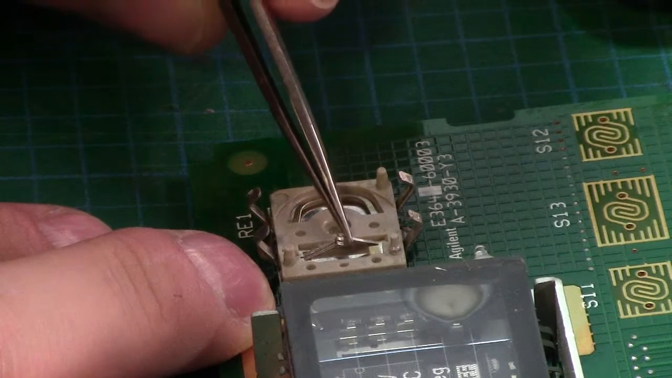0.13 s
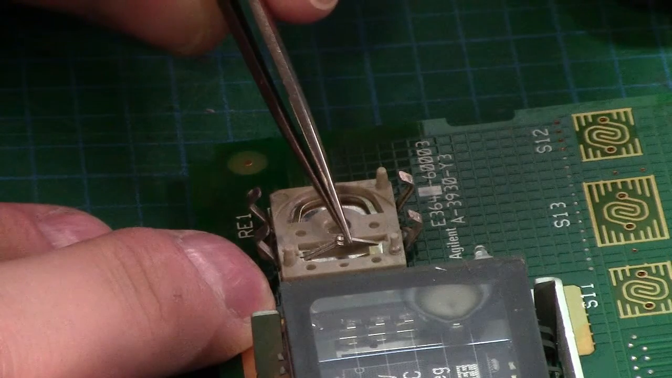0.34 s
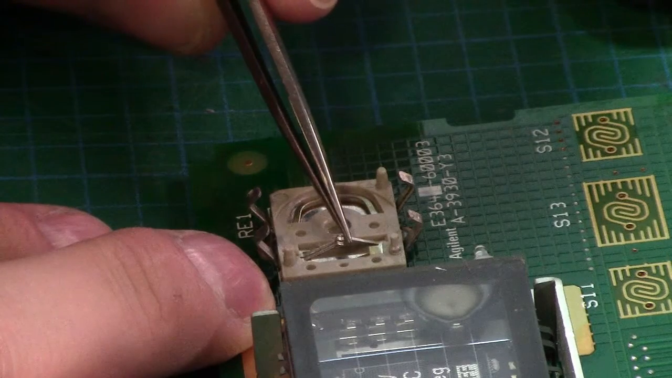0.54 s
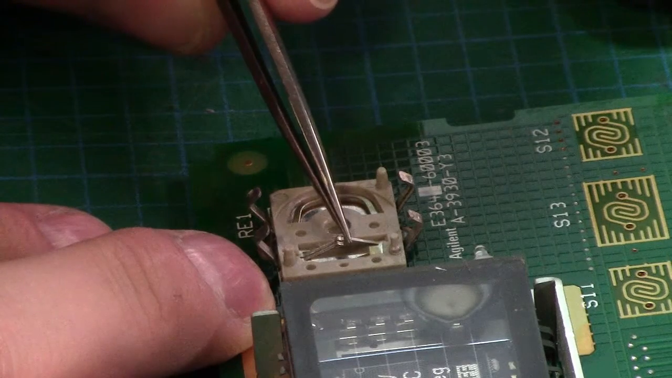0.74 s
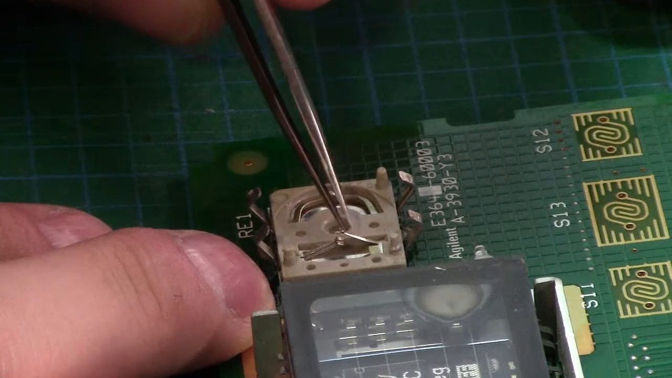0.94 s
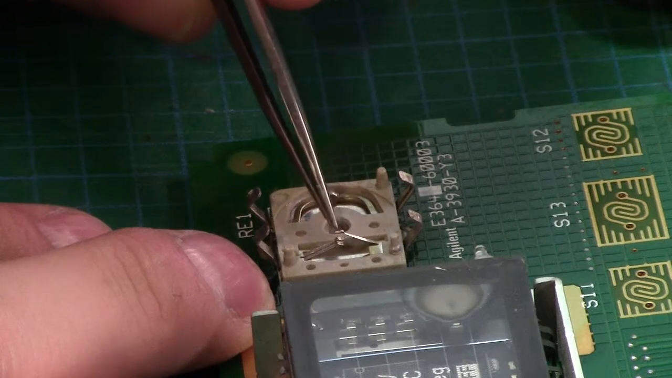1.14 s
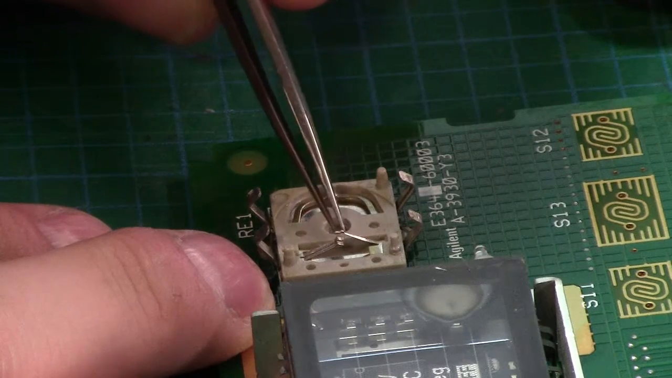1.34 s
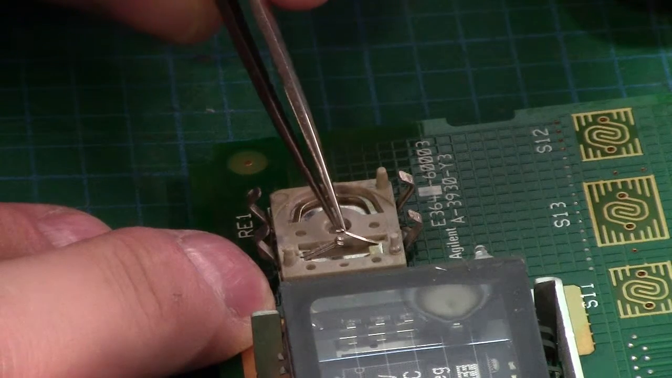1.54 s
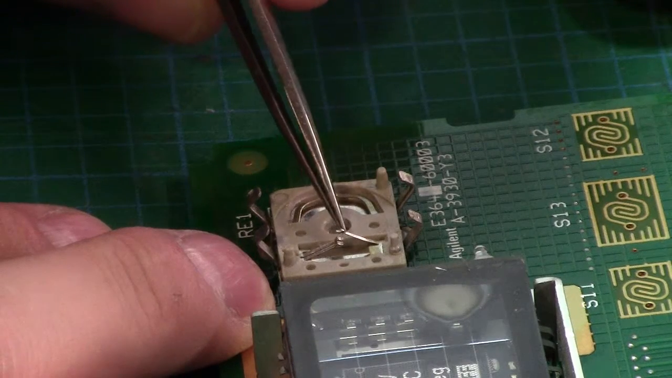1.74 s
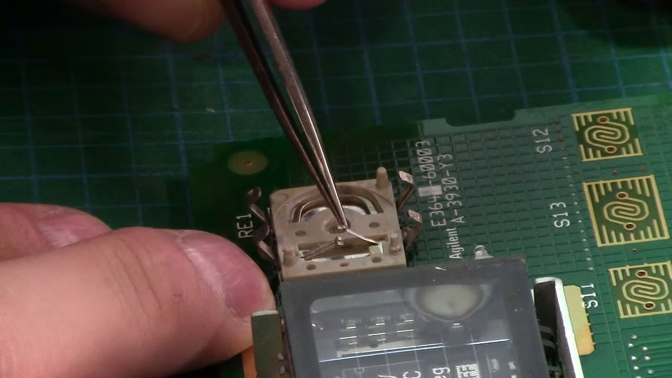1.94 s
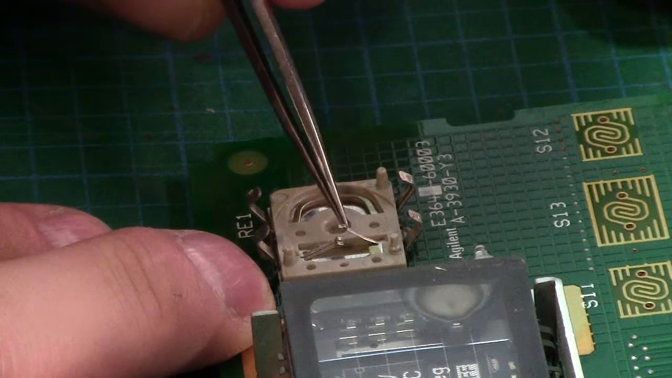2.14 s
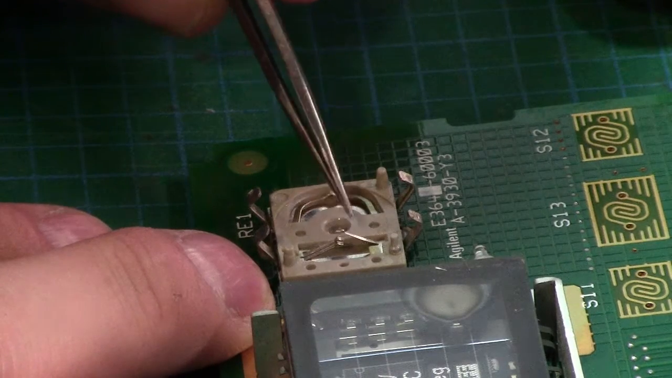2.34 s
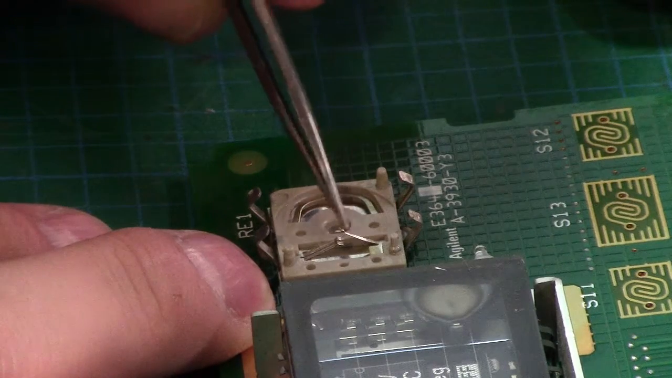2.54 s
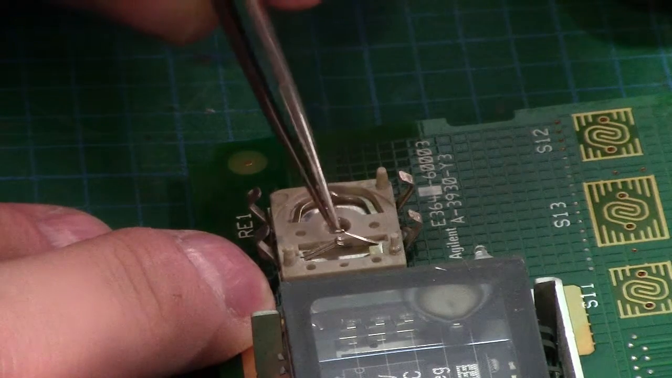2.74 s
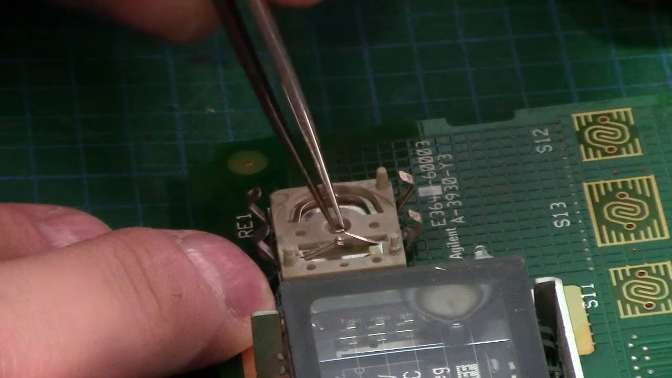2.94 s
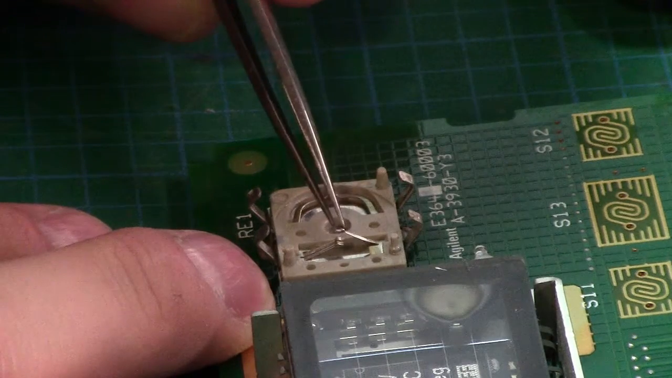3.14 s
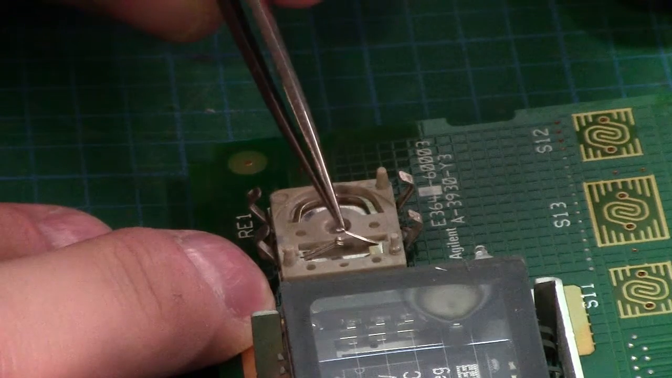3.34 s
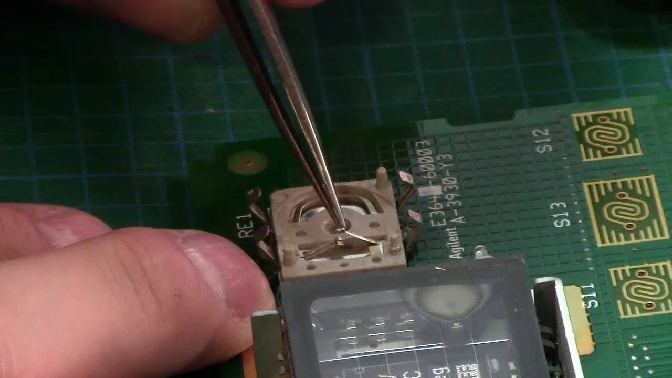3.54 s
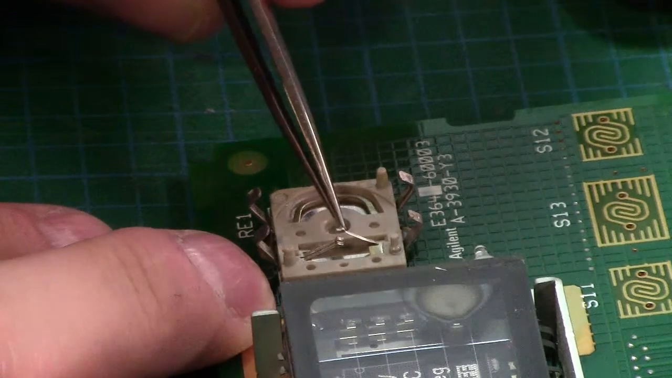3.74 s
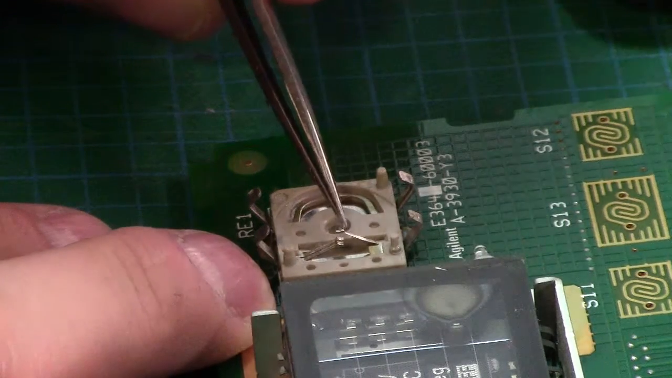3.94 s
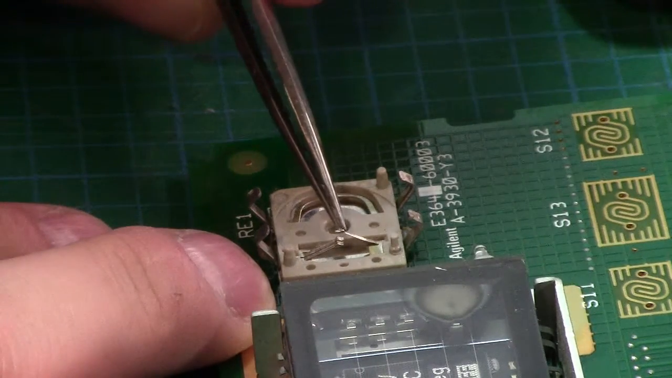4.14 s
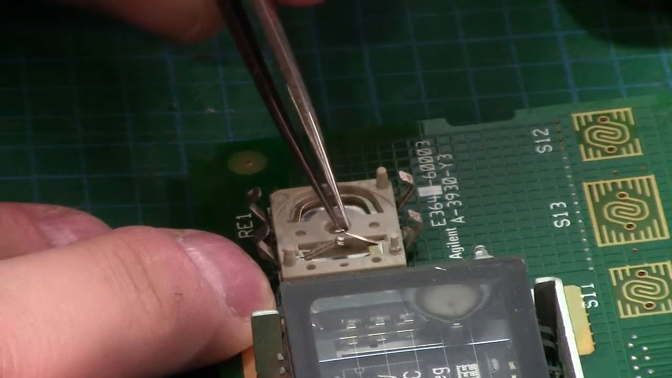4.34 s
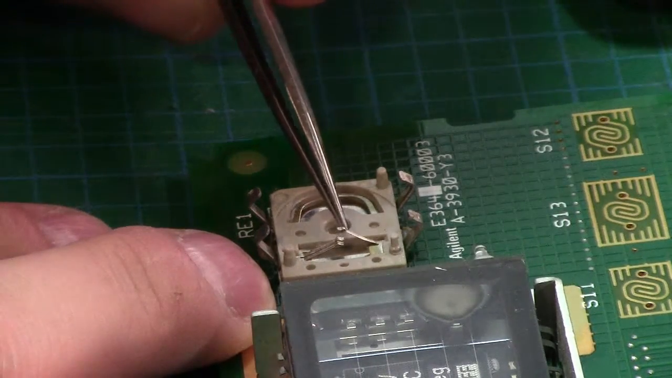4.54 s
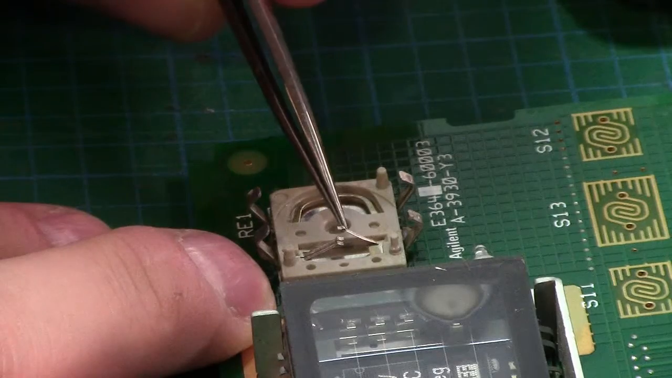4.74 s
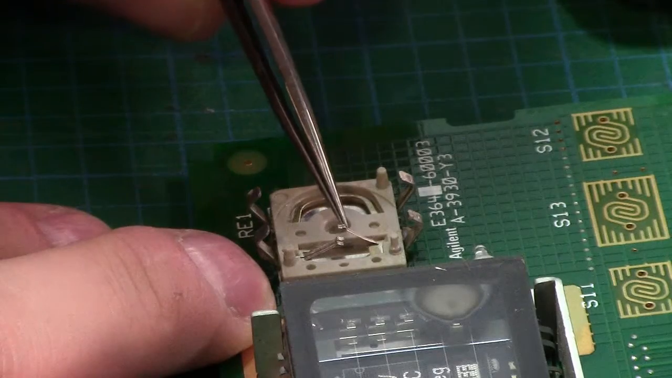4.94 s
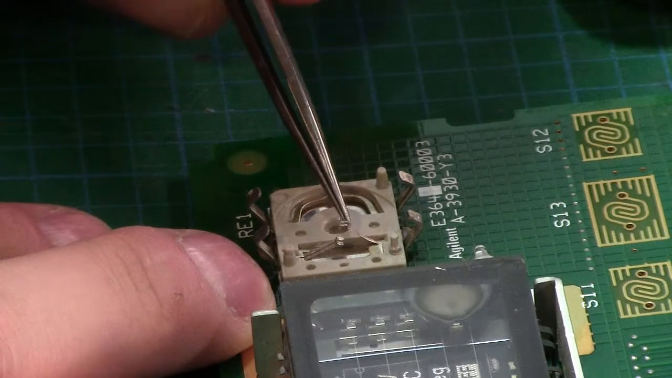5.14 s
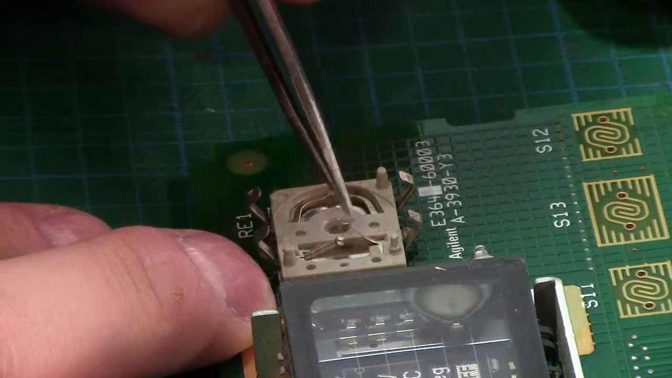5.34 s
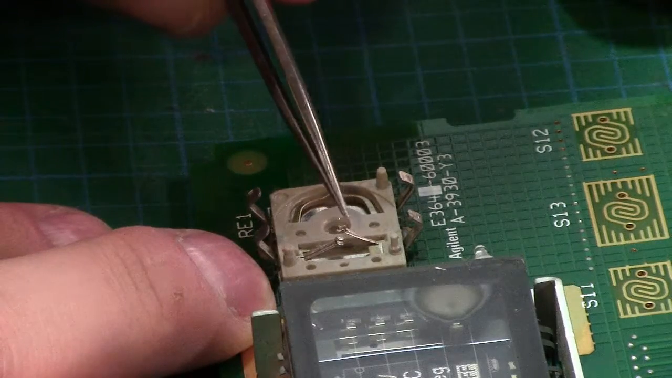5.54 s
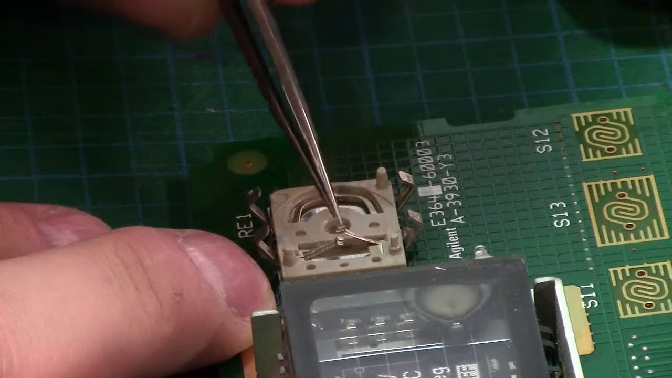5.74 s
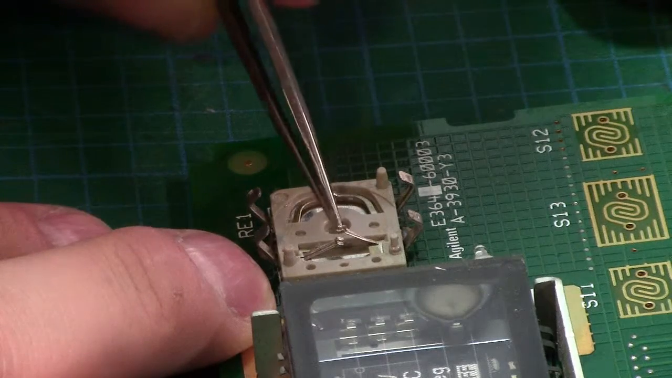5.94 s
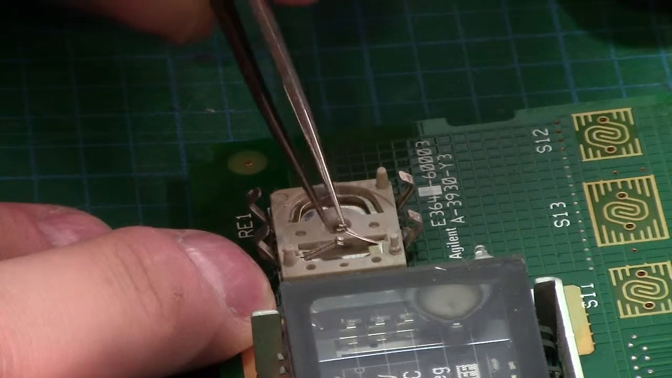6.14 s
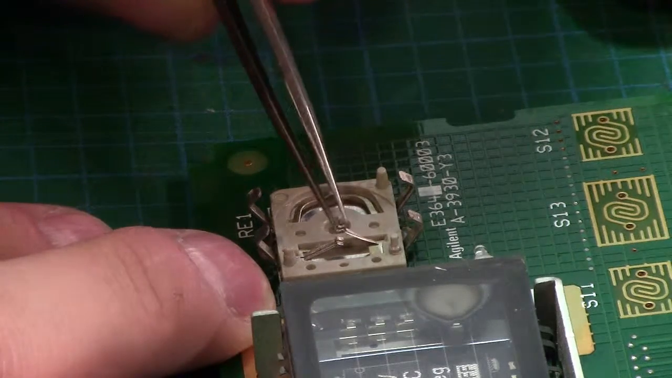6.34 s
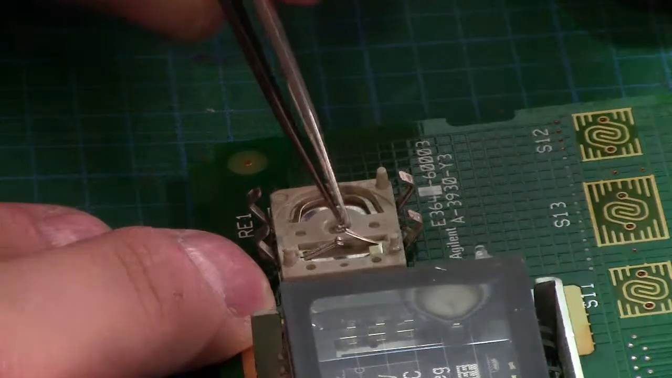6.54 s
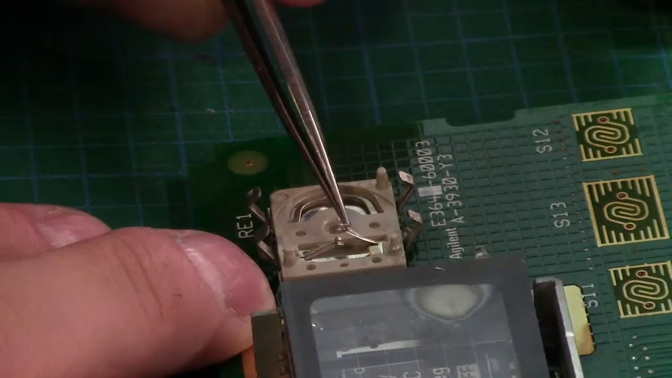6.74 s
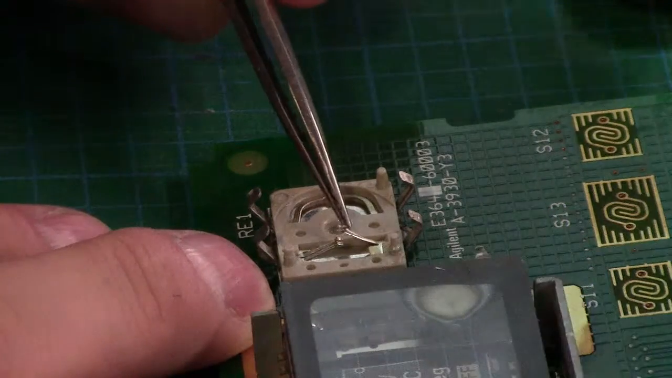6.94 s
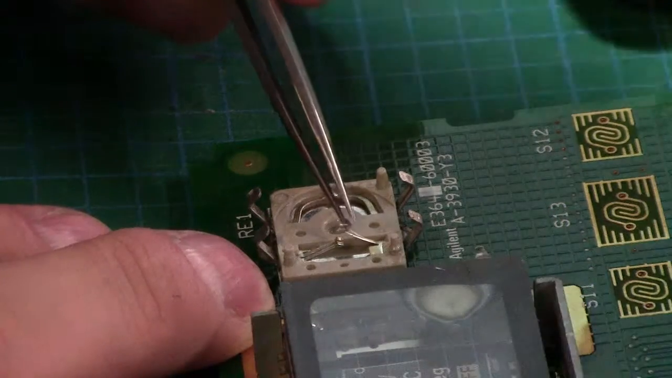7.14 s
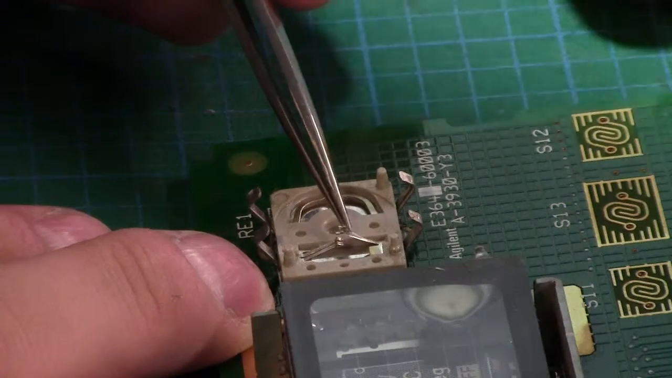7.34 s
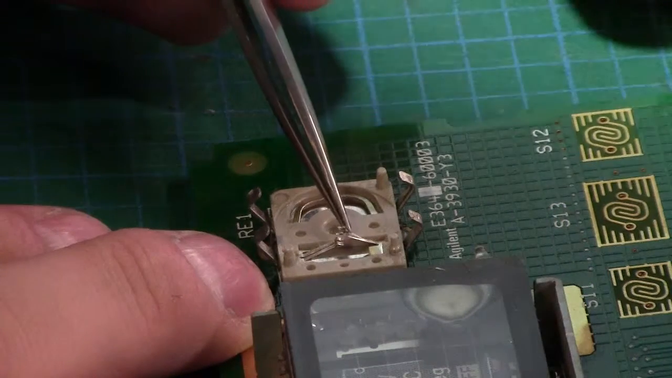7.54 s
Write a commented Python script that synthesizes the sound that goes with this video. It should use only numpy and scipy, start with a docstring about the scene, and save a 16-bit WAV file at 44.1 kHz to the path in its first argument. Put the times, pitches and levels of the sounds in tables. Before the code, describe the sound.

An equipment fan gives a steady hum and dull rush in a small workroom while, near the microphone, metal tweezers work on tiny springs. The tips make sparse, irregular, high ticks, some barely audible. Twice, about three seconds apart, a spring slips and snaps with a crisp click and a brief thin ring, the second slightly louder. A smaller click and a faint tick come near the end.

```python
"""Fine steel tweezers pick at the contact springs of a small switch on a circuit board, close up.
Twice a spring slips off the tips and snaps; in between, the tips tick against the metal.
Every click is a brief crack of contact plus a ring; a faint, thin high note lingers after both snaps.
A small workroom answers each click, over the steady hum and rush of an equipment fan."""
import sys
import numpy as np
from scipy import signal
from scipy.fft import rfft, irfft
from scipy.io import wavfile

SR = 44100
rng = np.random.default_rng(int(sys.argv[2]) if len(sys.argv) > 2 else 0)


def dump_mix(stems):
    """Bounce the given channels to the path in sys.argv[1] as a 16-bit WAV at rate SR."""
    frames = np.atleast_2d(stems).T  # one column per channel
    limited = np.clip(frames, -1, 1)  # hard clip at full scale
    pcm = np.round(limited * 32767).astype(np.int16)
    wavfile.write(sys.argv[1], SR, pcm)


N = 339248


def tweezers():
    """The dry close-up: metal under tension slips free or lands, and the tips tick against it."""
    # The snaps. Each row: start in seconds, level in dB, part that rings,
    # pitch in Hz favoured by the point of contact, boost or cut at that pitch in dB.
    snaps = [(2.3064, -15.5, "short spring", 11000, 2.5), (2.3177, -24.5, "seat", 10500, -8),
             (5.4, -13.5, "long spring", 15100, 5), (6.2264, -30, "arms", 10400, 0.5)]
    # The ticks. Each row: start in seconds, level in dB, part that rings, pitch in Hz favoured by the
    touches = [ (1.0542, -37, "tips", 15500, 6060, 0.0095, 3), (1.4578, -46, "tips", 11300, 6100, None, 0),
               (2.9277, -26.5, "tips", 9650, 14500, None, 0), (3.093, -41, "one tip", 10500, 5800, .027, 1),
               (3.4079, -51.5, "tips", 11000, 11000, .0175, 0),
               (3.5555, -44.5, "tips", 14000, 7700, .022, 0), (3.9438, -35.5, "tips", 11300, 4960, None, 0),
               (5.8300, -58, "tips", 10700, 10700, None, 0), (7.0754, -51, "seat", 6600, 6550, None, 1), ]
    mix = np.zeros(N)
    for start_s, *blow in snaps:
        add(mix, start_s, click(*blow))
    for row in touches:
        for start_s, sound in touch(*row):
            add(mix, start_s, sound)
    return mix


def touch(start_s, db, part, first_hz, second_hz, graze_s, bounce_count):
    """One tick as (start, sound) blows: tip after tip lands; some ticks graze first or bounce after."""
    second_tip_s, second_tip_db = 0.001, -6.5
    graze_db, bounce_db, bounce_s = -10, -10.5, 0.011
    blows = [(start_s, click(db, part, first_hz, spot_db=5)),
             (start_s + second_tip_s, click(db + second_tip_db, part, second_hz, spot_db=17.5))]
    if graze_s:  # one tip brushes the metal before both catch
        blows.append((start_s - graze_s, click(db + graze_db, "one tip", spot_hz=9300, spot_db=-3)))
    for k in range(1, bounce_count + 1):  # the springy arms bring the tips back at an even pace
        blows.append((start_s + bounce_s * k, click(db + bounce_db, part, first_hz, spot_db=0)))
    return blows


def click(db, part, spot_hz, spot_db, rise_s=0.00033, spot_octaves=0.26, crack_t60=0.008):
    """Metal slips off or strikes metal: a brief crack and a ring, with the attack set to db."""
    # The tones heard when each part sounds. Each row: pitch in Hz, level in dB, seconds to fade by 60 dB.
    # The two rows near 15.6 kHz are a faint, thin high ring that lingers after each snap;
    # the rest are modes of the springs, their seat and the tweezers' tips and arms.
    tones = { "long spring": [(1980, -21, 0.047), (2240, -15.5, 0.036), (2650, -18, 0.068),
             (2980, -15.5, 0.019), (3380, -14.5, 0.034), (3680, -32, 0.062), (4600, -23, .05),
             (5140, -18.5, 0.098), (5217, -14.5, 0.1), (5260, -14, 0.035), (6100, -15, .016),
             (7000, -11, 0.025), (8250, -18, 0.051), (9500, -22, 0.013), (9830, 4, 0.01),
             (9950, -19, 0.047), (10240, -2.5, 0.025), (10550, -6, 0.0056), (12500, -3.5, .016),
             (13400, -11, 0.015), (14900, -21, .015), (15620, -20, 0.11)],
             "short spring": [(2160, -18, 0.025), (2750, -16.5, 0.018), (3460, -13, .025),
             (4020, -11, .025), (5200, -15, .06), (7180, -3, 0.025), (9770, 4, 0.01), (9750, -21, 0.087),
             (11300, -1, .008), (12570, 5.5, 0.011), (14100, -1, 0.0089), (15500, 2, 0.016),
             (15650, -18, .08)], "seat": [(2230, -16, 0.017), (3480, -16, 0.023), (5050, -8, 0.091),
             (5280, -8, 0.037), (6610, -5, 0.033), (8550, -20, .015), (10550, 1, .025), (10300, -4, .03),
             (10900, 1, 0.0086)], "tips": [(2220, -11, 0.013), (4370, -17, 0.008), (5250, -15, .015),
             (6040, -3, 0.014), (6730, -9, 0.015), (8320, -2.5, 0.014), (8760, -2, 0.005),
             (10340, -4, 0.011), (10900, -6, 0.017), (10980, 1, 0.0077), (13300, -6, 0.006),
             (14450, 0.5, 0.0058)], "one tip": [(6200, -10, 0.014), (6700, -10, .014), (9200, 3, 0.006),
             (9570, 4, 0.0099), (10800, -17, 0.014), (14400, -18, .01)], "arms": [(2180, -15, .025),
             (3560, -9, 0.12), (4400, -13, 0.018), (5320, -8, 0.036), (6060, -1, 0.011), (6700, -9, .02),
             (7400, -9, .04), (10180, -3, .03), (10500, -1.5, 0.028), (13700, -6, .018)], }
    # The tone of the contact itself. Each row: frequency in Hz, gain in dB.
    crack_tone = [(600, -45), (1300, -16.5), (2200, -0.5), (5000, 0.5), (10000, 3.5), (16000, -8.5)]
    # The balance of crack against ring: a level in dB for each part.
    crack_db = {"long spring": 8, "short spring": 6.5, "seat": 11.5, "tips": 6.5, "one tip": -8, "arms": 7}
    t = np.arange(SR // 4) / SR
    ring = sum(from_db(level - 60 * t / t60) * np.sin(2 * np.pi * (hz * t + rng.random()))
               for hz, level, t60 in tones[part])
    burst = rng.standard_normal(len(t)) * from_db(crack_db[part] - 60 * t / crack_t60)
    crack = colour(evened(burst), lambda hz: curve_at(crack_tone, hz))
    onset = 1 - np.exp(-(t / rise_s) ** 2)
    # the spot where the tips touch decides which modes take most of the blow
    sound = colour((ring + crack) * onset,
                   lambda hz: spot_db * np.exp(-(np.log2((hz + 1) / spot_hz) / spot_octaves) ** 2))
    attack = sound[:SR // 800]
    return from_db(db) * sound / np.sqrt(np.mean(attack ** 2))


def evened(burst, dip_floor=0.1):
    """Smooths out the chance peaks and dips in the spectrum of a short burst."""
    power = abs(np.fft.fft(burst, 2 * len(burst))) ** 2
    return colour(burst, lambda hz: -10 * np.log10(power / power.mean() + dip_floor))


def colour(sound, db_at):
    """Minimum-phase EQ with the gain db_at(Hz), so attacks stay sharp."""
    size = 2 * len(sound)
    hz = abs(np.fft.fftfreq(size, 1 / SR))
    log_gain = np.log(from_db(db_at(hz)))
    response = np.exp(np.conj(signal.hilbert(log_gain)))
    return np.fft.ifft(np.fft.fft(sound, size) * response).real[:len(sound)]


def room(clicks, bench_db=-9, bench_t60=0.032, bench_s=0.00397, tail_db=-8, tail_s=0.0035):
    """Quick scatter from the bench top, then a short tail whose highest treble dies first."""
    # The workroom's decay. Each row: frequency in Hz, seconds to fade by 60 dB.
    room_t60 = [(1000, 0.23), (4000, 0.3), (8000, 0.25), (16000, 0.18)]
    echoes_per_s = 4000
    t = np.arange(SR // 2) / SR
    polarity = rng.choice([-1., 1.], (2, len(t)))
    near, far = polarity * (rng.random((2, len(t))) < echoes_per_s / SR)
    bench = near * (t > bench_s) * from_db(-60 * t / bench_t60)
    hz, age, bands = signal.stft(far * (t > tail_s), SR, nperseg=256)
    fade = from_db(-60 * age / curve_at(room_t60, hz)[:, None])
    tail = signal.istft(bands * fade, SR)[1][:len(t)]
    bench *= from_db(bench_db) / np.linalg.norm(bench)
    tail *= from_db(tail_db) / np.linalg.norm(tail)
    return signal.fftconvolve(clicks, bench + tail)[:N]


def fan():
    """The background bed: steady turbulence, humming in narrow resonances above a dull rush."""
    # The rush of air, with microphone hiss. Each row: frequency in Hz, noise density in dB per Hz.
    rush = [(10, -96), (28, -102), (38, -86), (56, -78), (90, -74), (230, -73.5), (340, -79), (600, -79.5),
            (900, -86.5), (1200, -82.5), (1450, -88), (1950, -86), (2700, -92.5), (4200, -97),
            (8000, -102.5), (16000, -109.5)]
    # Resonances of the fan's housing and the room.
    # Each row: centre in Hz, width in Hz, noise density at the peak in dB per Hz.
    hum = [(44.3, 12.7, -59.5), (69, 12, -65.5), (122.4, 15.4, -65), (145.8, 4.9, -66), (206.2, 4.5, -70),
           (255, 26, -78.5), (404, 30, -80.5), (472.3, 25.5, -74.5), (546, 14.6, -75), (624, 5.4, -74),
           (720, 15, -71), (767.5, 14, -76.5), (801, 25, -71), (843.6, 41, -74), (961, 16.4, -75.5),
           (1033, 49, -75.5), (1111, 15.6, -77.5), (1136.5, 26, -75), (1210, 41, -93), (1772, 34, -84),
           (2110, 14, -85), (2360, 17, -86.5), (2870, 15, -86), (3090, 23, -90)]
    hz = np.fft.rfftfreq(N, 1 / SR)
    power = from_db(curve_at(rush, hz)) ** 2
    for centre, width, db in hum:
        resonance = from_db(db) / (1 + ((hz - centre) / (0.66 * width)) ** 2)
        power += resonance ** 2
    return irfft(rfft(rng.standard_normal(N)) * np.sqrt(power * SR / 2), N)


def from_db(db):
    """Turns decibels into a gain."""
    return 10 ** (np.asarray(db) / 20)


def curve_at(points, hz):
    """The value at hz of points joined by straight lines on a log-frequency axis."""
    point_hz, values = np.transpose(points)
    return np.interp(np.log(hz + 1), np.log(point_hz + 1), values)


def add(mix, start_s, sound):
    """Lays a sound into the mix at its start time."""
    span = mix[round(start_s * SR):][:len(sound)]
    span += sound[:len(span)]


def scene():
    """Clicks, their echoes and the fan at one microphone."""
    clicks = tweezers()
    return (clicks + room(clicks) + fan())[None]


def record(dry):
    """The converter trims the very top of the treble and adds a small steady offset."""
    edge_hz, offset = 15900, 0.0142
    low_pass = signal.firwin(401, edge_hz, window=("kaiser", 8), fs=SR)
    return signal.oaconvolve(dry, low_pass[None], "same") + offset


dry = scene()
out = record(dry)
dump_mix(out)
```